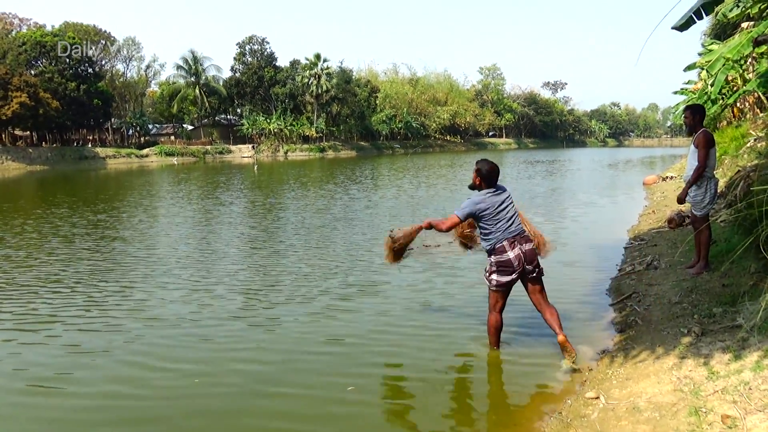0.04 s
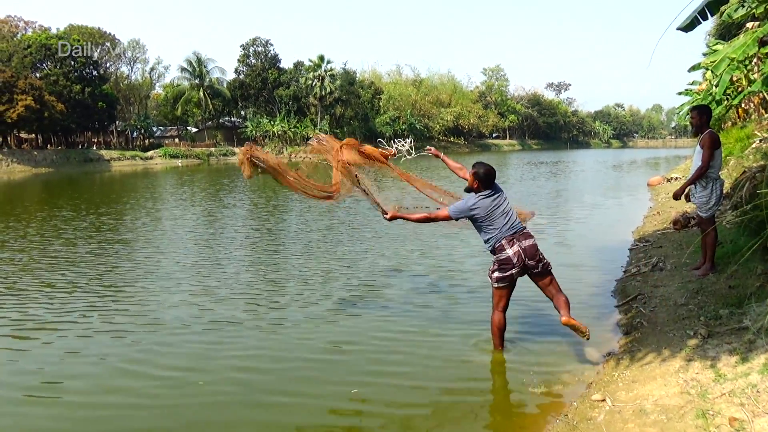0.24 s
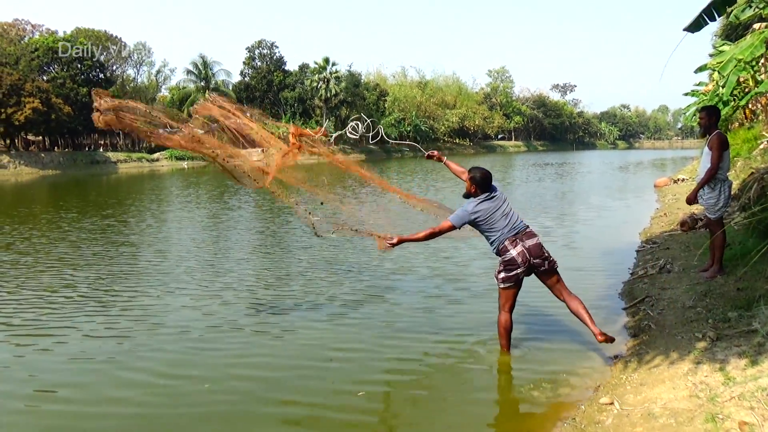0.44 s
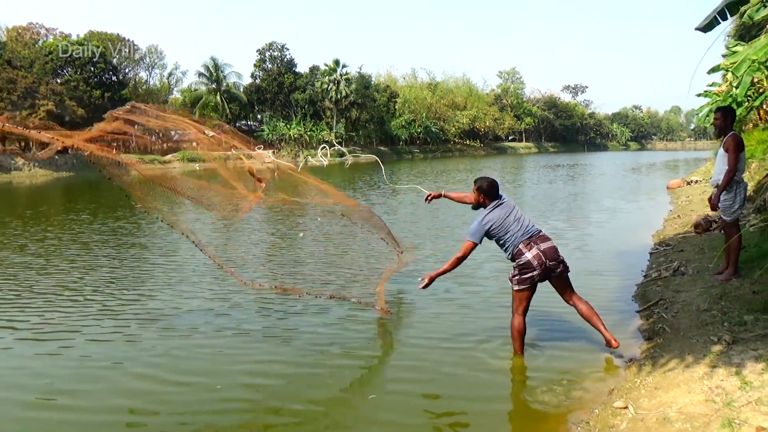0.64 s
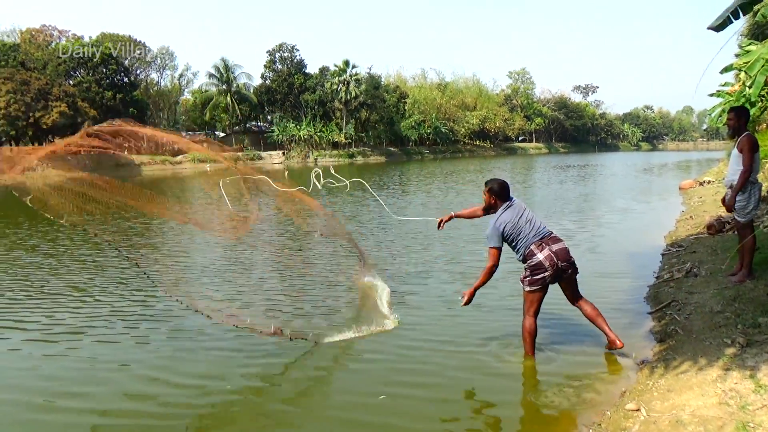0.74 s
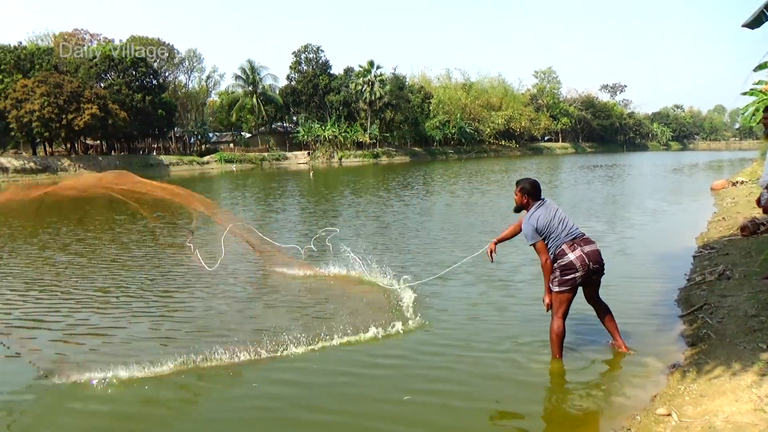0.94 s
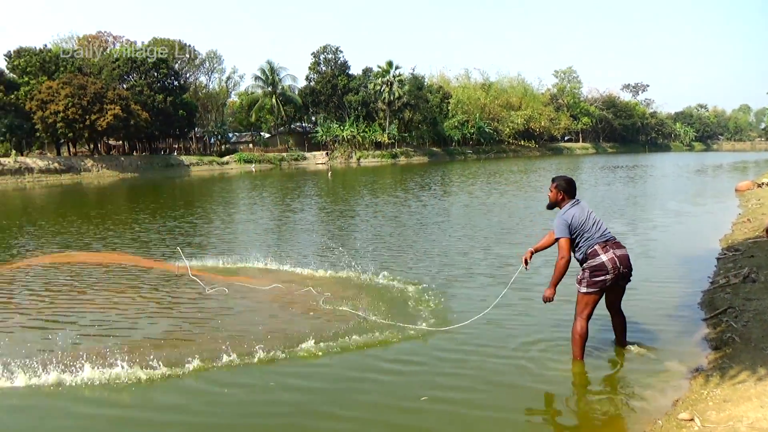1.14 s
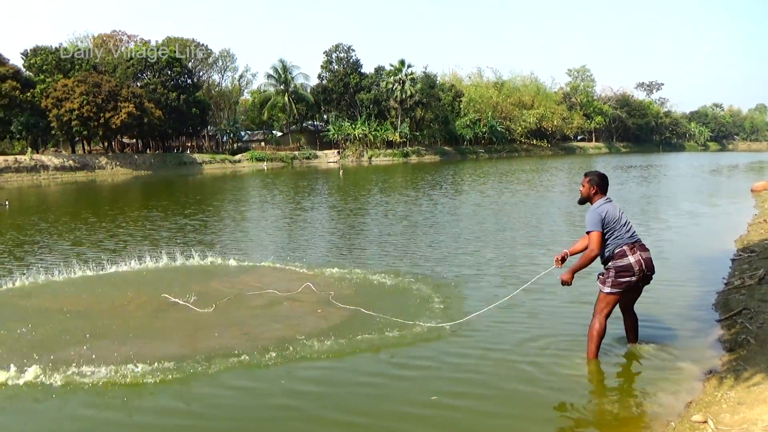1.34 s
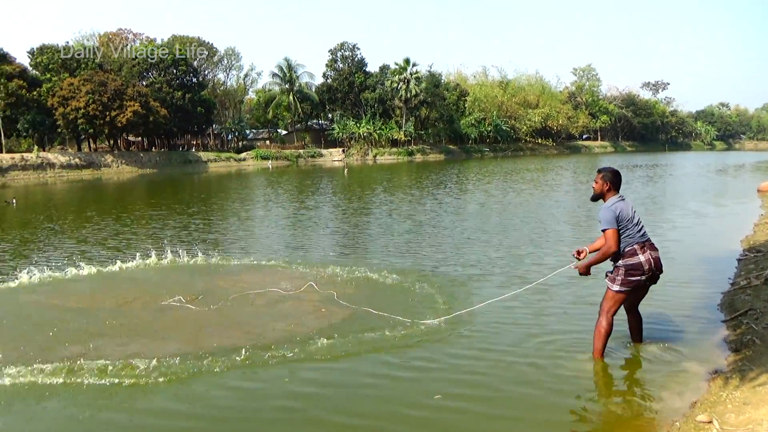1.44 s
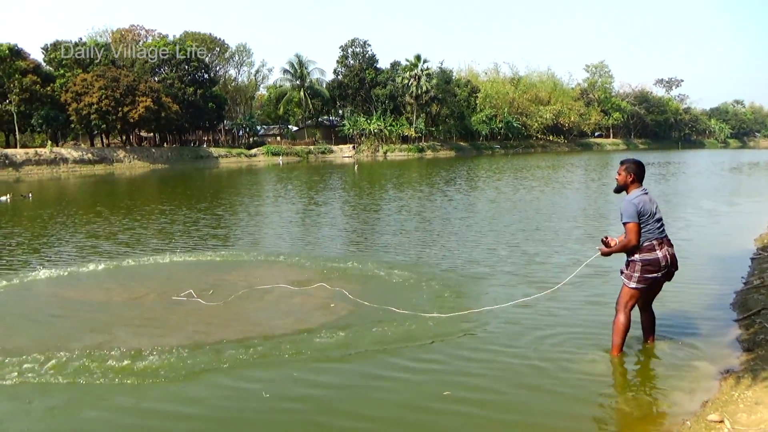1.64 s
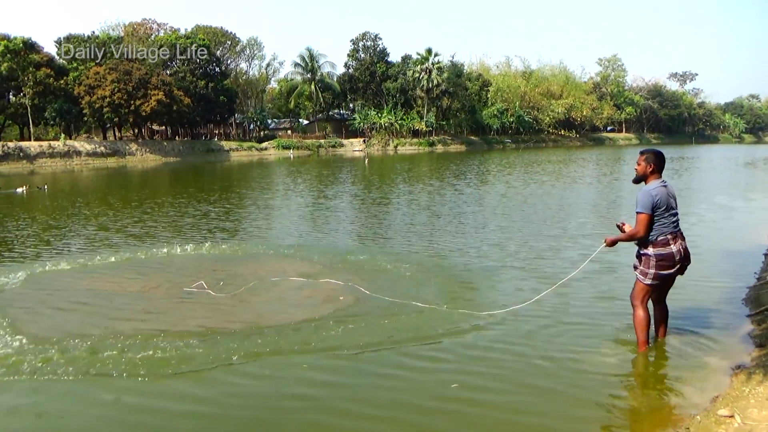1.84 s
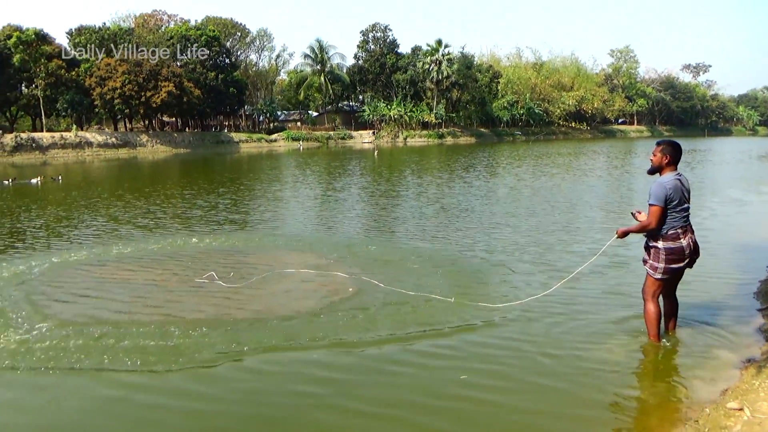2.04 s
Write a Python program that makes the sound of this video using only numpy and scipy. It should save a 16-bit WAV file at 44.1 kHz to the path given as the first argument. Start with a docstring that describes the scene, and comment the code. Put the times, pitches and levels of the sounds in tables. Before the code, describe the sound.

A cast net splashes onto a quiet pond. At the start a foot lightly stirs the shallows, and metal sinkers click in the air from 0.2 to 0.8 seconds under faint bird chirps. The net lands at about 0.8 seconds with spray and plopping bubbles, peaking with deep gulps around 1.3 seconds, slightly left. It fades to pattering drops by 2 seconds, with one faint distant bird note.

```python
"""Cast net on a pond

A foot stirs the shallows and a net is thrown. Its metal sinkers click together in the air, then hit
the water one after another around the ring: spray, plopping bubbles and deep gulps, fading to a patter
of falling drops. Faint birds call over the quiet bank."""
import sys
import numpy as np
from scipy import signal
from scipy.io import wavfile

SR = 44100
rng = np.random.default_rng(int(sys.argv[2]) if len(sys.argv) > 2 else 0)


def waveform_to_disk(signal):
    """Save audio, clipped to [-1, 1], as 16-bit WAV at the path in sys.argv[1]."""
    frames = np.transpose(np.atleast_2d(signal))
    scaled = np.clip(frames, -1, 1) * 32767
    samples = np.round(scaled).astype(np.int16)
    wavfile.write(sys.argv[1], SR, samples)


N = 92610
T = np.arange(N) / SR


def from_db(db):
    """Decibels to gain."""
    return 10 ** (np.asarray(db) / 20)


def rms_one(x):
    """Scale to unit rms."""
    return x / np.sqrt(np.mean(x ** 2) + 1e-20)


def in_time(rows):
    """Each column of a breakpoint curve, at every sample."""
    times, *columns = np.transpose(rows)
    return [np.interp(T, times, column) for column in columns]


def level(rows):
    """Gain envelope from a dB curve."""
    return from_db(in_time(rows)[0])


def band(x, low_hz, high_hz):
    """Band-pass filter."""
    sos = signal.butter(2, [low_hz, min(high_hz, .48 * SR)], "band", fs=SR, output="sos")
    return signal.sosfilt(sos, x + 1e-18)


def pan(left_minus_right_db):
    """Left and right gains."""
    return from_db(np.array([[.5], [-.5]]) * left_minus_right_db)


def impacts(per_s, spread_db):
    """Random impulses of uneven size, rms 1."""
    sizes = from_db(spread_db * np.minimum(rng.exponential(1, N), 4))
    return rms_one(sizes * rng.choice([-1, 1], N) * (rng.random(N) < per_s / SR))


def cloud(colour, low_hz, high_hz, per_s, spread_db, wash, crack, side_db, bands):
    """Grains ring briefly in each band, over a smooth wash and cracks that span all bands; stereo."""
    edges = np.geomspace(low_hz, high_hz, bands + 1)
    hz, db = np.transpose(colour)
    cracks = impacts(per_s, spread_db)
    out = 0
    for k, (low, high) in enumerate(zip(edges, edges[1:])):
        grains = impacts(per_s, spread_db)
        mid = rms_one(grains + wash * rng.standard_normal(N) + crack * (-1) ** k * cracks)
        side = from_db(side_db) * rng.standard_normal(N)
        gain = from_db(np.interp(np.log(low * high) / 2, np.log(hz), db))
        out = out + gain * band(np.array([mid + side, mid - side]), low, high)
    return rms_one(out)


def bank_echo(x, echo_db, t60_s):
    """A sound plus its scatter from the bank, different on each side and weak in bass and top."""
    tail = band(rng.standard_normal((2, N)), 400, 8000) * from_db(-60 * T / t60_s) * (T > .004)
    tail = rms_one(tail) * np.sqrt(.5 / N)
    return x + from_db(echo_db) * signal.fftconvolve(np.atleast_2d(x), tail, axes=1)[:, :N]


def open_air():
    """A soft bed of rumble and hiss, nearly the same on both sides."""
    # tone of the air: frequency_hz, density_db
    colour = [(35, -1.5), (100, -3.5), (300, -14.5), (1200, -24), (3000, -25.5), (9000, -25.5),
              (16000, -41)]
    bed = cloud(colour, 28, 16000, per_s=5000, spread_db=1, wash=2, crack=0, side_db=-21, bands=16)
    return from_db(-50) * bed


def distant_calls():
    """Quick falling bird chirps, and one long faint note that sags."""
    # the long note's glide: time_s, pitch_hz, level_db
    far_note = [(1.87, 793, -46), (2.1, 708, -48.5)]
    # bird chirps: start_s, peak_db
    chirps = [(.178, -44.5), (0.253, -42.5), (0.327, -40.5), (0.621, -53)]
    top_hz, end_hz, fall_s, swell_s = 1394, 810, .01726, .013
    note_hz, note_db = in_time(far_note)
    out = from_db(note_db) * np.sin(2 * np.pi * np.cumsum(note_hz) / SR) * (T > far_note[0][0])
    for start, db in chirps:
        age = np.maximum(T - start, 0)
        glide_hz = end_hz + (top_hz - end_hz) * np.exp(-age / fall_s)
        waver = 1 + .02 * rms_one(band(rng.standard_normal(N), 27, 190))
        envelope = from_db(db) * age / swell_s * np.exp(1 - age / swell_s)
        out += envelope * np.sin(2 * np.pi * np.cumsum(glide_hz * waver) / SR)
    return out


def sinker_clicks():
    """Sinkers knock together and rebound at uneven gaps, ringing their dead, high modes."""
    # sharp clicks, mostly sinker on sinker: start_s, relative_db
    clinks = [(0.218, -18), (0.2398, -16), (0.258, -15.5), (0.2731, -22.5), (0.328, -23.5), (0.4672, -18),
              (0.4976, -19), (0.5105, -14.5), (0.543, -14), (0.551, -19.5), (0.581, -22.5), (0.6024, -21),
              (0.614, -18), (0.633, -17.5), (0.708, -27.5), (0.7371, -20), (0.7822, -20), (1.449, -19),
              (1.703, -20)]
    # a sinker's modes: pitch_hz, gain_db
    modes = [(7300, -3.5), (8500, 11.5), (9900, 2.5)]
    contacts, rebound_s, rebound_loss_db = 5, .0028, 3.5
    t60_s, trim_db = .0016, -7
    starts, first_db = np.transpose(clinks)[:, :, None]
    gaps = rebound_s * rng.uniform(.4, 1.6, (len(clinks), contacts))
    hit_s = starts + np.cumsum(gaps, axis=1) - gaps[:, :1]
    hit_db = first_db + trim_db - rebound_loss_db * np.arange(contacts)
    decay = from_db(-60 / (t60_s * SR))
    ringing = 0
    for hz, mode_db in modes:
        hits = np.zeros(N)
        hits[(hit_s * SR).astype(int)] = from_db(hit_db + mode_db + rng.normal(0, 1.5, hit_s.shape))
        resonator = [1, -2 * decay * np.cos(2 * np.pi * hz / SR), decay ** 2]
        ringing = ringing + signal.lfilter([.5, 0, -.5], resonator, hits + 1e-18)
    return band(ringing, 5000, 12500) * pan(1)


def sinker_rattle():
    """The sinker line jostles lightly, in flight and as it lands."""
    # rattle envelope: time_s, level_db
    jostle = [(0, -54), (.15, -49), (.27, -43.5), (.305, -46.5), (.335, -38), (.39, -44.5), (.425, -38.5),
              (.455, -42.5), (.51, -38.5), (.635, -44.5), (.66, -47), (.775, -57), (.787, -32.5),
              (.89, -27.5), (1.1, -55.5)]
    # rattle tone: frequency_hz, density_db
    colour = [(3000, -8), (5000, -7.5), (8300, 0), (10000, 7), (12000, -22.5), (16000, -8)]
    rattle = cloud(colour, 2420, 14330, per_s=1900, spread_db=6.5, wash=.26, crack=1, side_db=-17, bands=10)
    return level(jostle) * rattle


def slaps():
    """A foot or a bunch of sinkers throws up a tight swarm of droplets."""
    # bursts of spray: centre_s, level_db, centre_hz, width_s
    bursts = [(0.096, -38, 2200, 0.0062), (0.1, -38, 5300, 0.0034), (0.1, -50.5, 2120, 0.083),
              (0.799, -35.5, 2100, 0.0084), (.899, -21, 7700, 0.0038), (1.001, -25.5, 7500, 0.0099),
              (1.002, -23.5, 1910, 0.0018), (1.265, -18.5, 2210, 0.0012)]
    out = 0
    for centre_s, db, hz, width_s in bursts:
        envelope = from_db(db) * np.exp(-.5 * ((T - centre_s) / width_s) ** 2)
        droplets = band(impacts(per_s=6600, spread_db=2.2), hz / 1.24, hz * 1.31)
        out = out + envelope * rms_one(droplets)
    return out


def large_bubbles():
    """Single bubbles ring and rise in pitch as they near the surface."""
    # bubbles: start_s, pitch_hz, level_db
    bubbles = [(.049, 4550, -13), (0.097, 997, -19.5), (.865, 870, -15.5), (0.867, 300, -21.5),
               (.900, 770, -10), (.929, 910, -13.5), (.993, 750, -11.5), (1.020, 830, -13.5),
               (1.061, 753, -11), (1.096, 255, -28.5), (1.272, 484, -12.5), (1.29, 388, -13),
               (1.347, 1357, -6.5), (1.383, 648, -14), (1.413, 311.5, -21.5), (1.552, 800, -22),
               (1.625, 1227, -12), (1.786, 369.5, -24), (1.922, 940, -26), (2.028, 1590, -22)]
    t60_cycles, swell_s, rise_per_s = 34, .003, 3.2
    out = np.zeros(N)
    for start, hz, db in bubbles:
        age = np.maximum(T - start, 0)
        envelope = from_db(db - 60 * age * hz / t60_cycles) * (1 - np.exp(-age / swell_s))
        out += envelope * np.sin(2 * np.pi * hz * age * (1 + rise_per_s * age / 2))
    return out


def splash():
    """Sinkers and mesh hit the water: fine spray, plops of small bubbles, gulps of deep air pockets."""
    # envelopes of the three layers: time_s, level_db
    spray_curve = [(.779, -92), (.783, -39), (.87, -31.5), (.98, -32), (1.01, -28.5), (1.06, -27.5),
                   (1.24, -29), (1.32, -24.5), (1.41, -32.5), (1.81, -36.5), (1.88, -44), (2.1, -49.5)]
    plop_curve = [(.78, -53), (.79, -55), (.825, -40), (.86, -26), (.97, -29.5), (1.01, -26), (1.24, -26),
                  (1.34, -23.5), (1.47, -31.5), (1.55, -29.5), (1.71, -35), (1.785, -30.5), (1.85, -39.5),
                  (2.1, -51)]
    gulp_curve = [(.82, -64), (.85, -48), (.88, -38.5), (.95, -37.5), (1.06, -39.5), (1.11, -31),
                  (1.25, -41), (1.285, -25.5), (1.41, -30), (1.47, -46.5), (1.72, -50.5), (1.77, -42),
                  (1.85, -49.5), (2.1, -68)]
    # tone of spray and of bubbles: frequency_hz, density_db
    spray_colour = [(3000, 0.5), (4000, -0.5), (6200, -3), (8200, 0), (9800, -6), (11800, -16),
                    (16000, -31)]
    bubble_colour = [(250, -8.5), (408, 1.5), (568, -8.5), (768, -2.5), (1660, -7.5), (3000, -9)]
    spray = cloud(spray_colour, 2800, 15700, per_s=1100, spread_db=4.5,
                  wash=.71, crack=.56, side_db=-14.5, bands=12)
    plops = cloud(bubble_colour, 575, 2960, per_s=380, spread_db=2.5,
                  wash=.39, crack=.31, side_db=-14.5, bands=11)
    gulps = cloud(bubble_colour, 220.6, 588, per_s=200, spread_db=2.5,
                  wash=.36, crack=.26, side_db=-22, bands=5)
    return level(spray_curve) * spray + level(plop_curve) * plops + level(gulp_curve) * gulps


def scene():
    """Net, water and birds over the open air."""
    # the splash drifts slightly left: time_s, left_minus_right_db
    splash_pan = [(.95, -0.5), (1.25, 2.5), (2.1, 2.1)]
    water = (splash() + large_bubbles() + slaps()) * pan(in_time(splash_pan)[0])
    birds = bank_echo(distant_calls(), echo_db=-10.5, t60_s=.54)
    sinkers = sinker_clicks() + sinker_rattle()
    return bank_echo(water + sinkers, echo_db=-15.5, t60_s=.11) + birds + open_air()


def record(dry):
    """A steep low-pass takes off the very top."""
    return signal.sosfilt(signal.cheby2(16, 60, 16600, fs=SR, output="sos"), dry)


dry = scene()
out = record(dry)
waveform_to_disk(out)
```